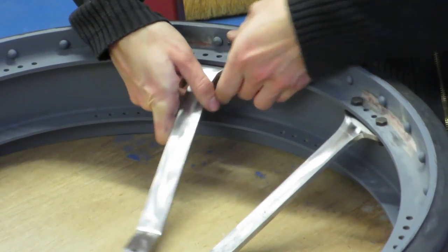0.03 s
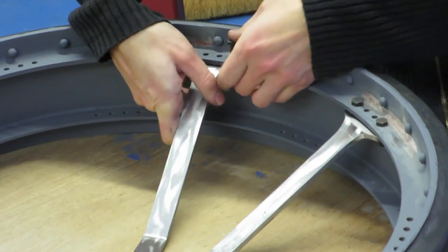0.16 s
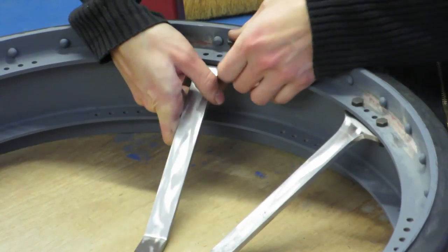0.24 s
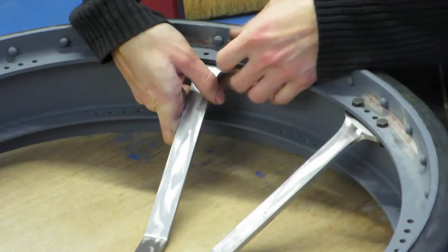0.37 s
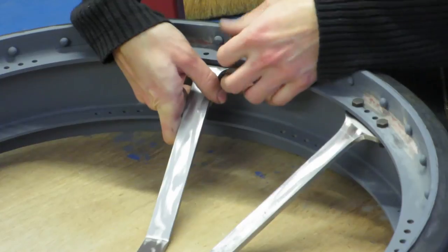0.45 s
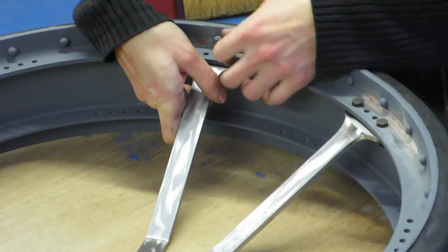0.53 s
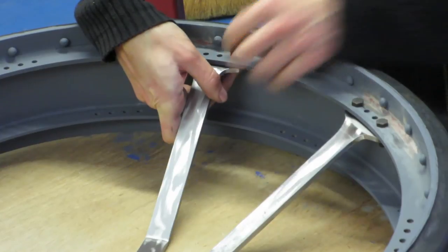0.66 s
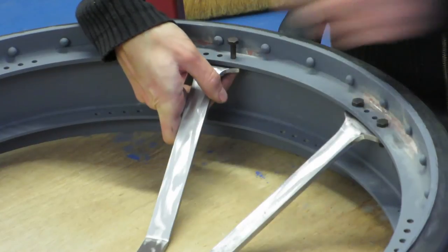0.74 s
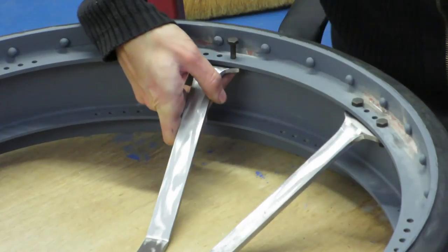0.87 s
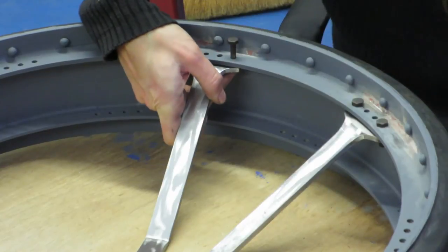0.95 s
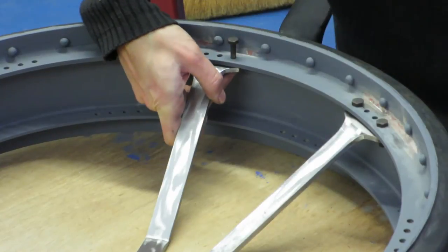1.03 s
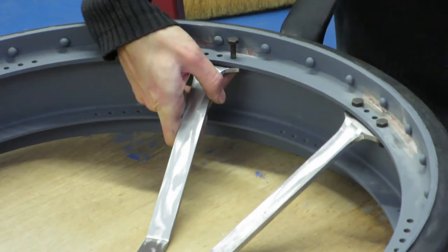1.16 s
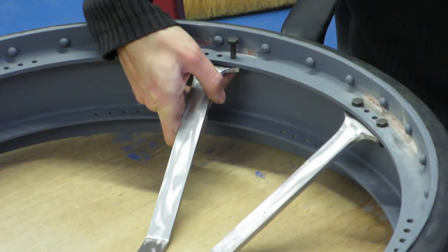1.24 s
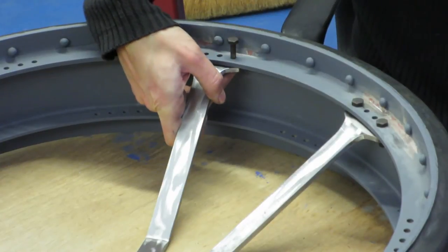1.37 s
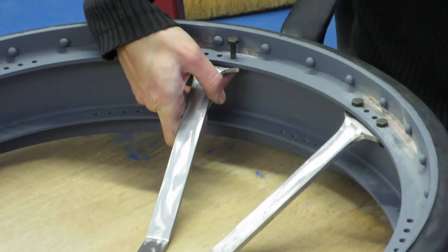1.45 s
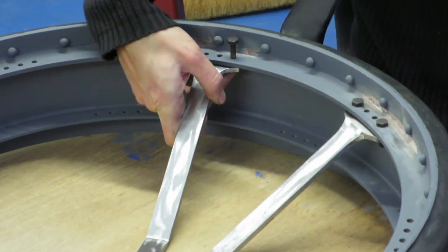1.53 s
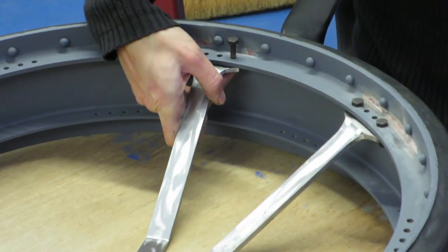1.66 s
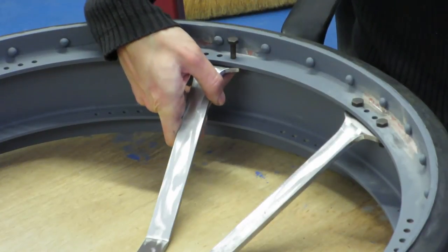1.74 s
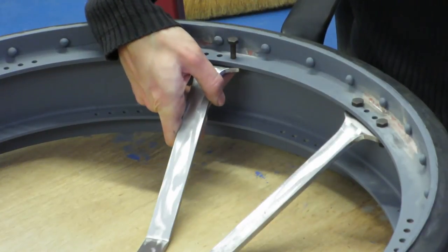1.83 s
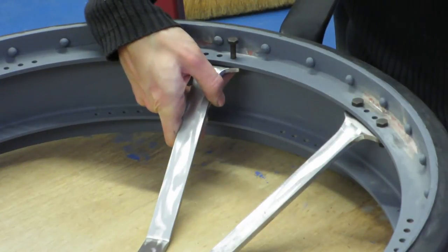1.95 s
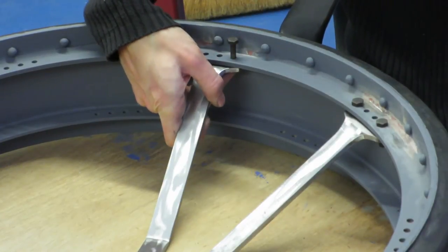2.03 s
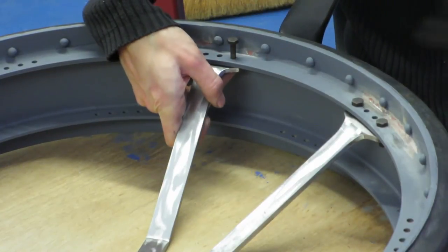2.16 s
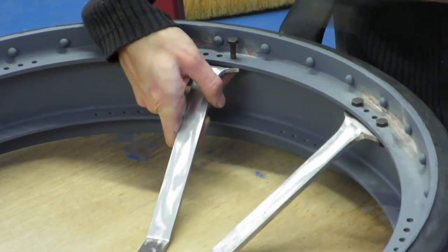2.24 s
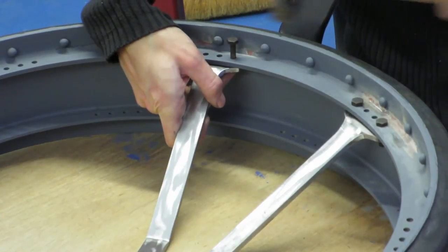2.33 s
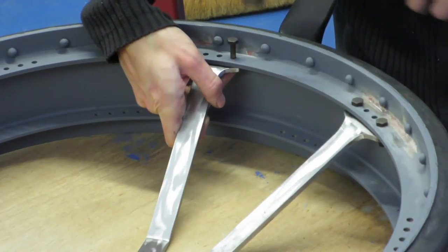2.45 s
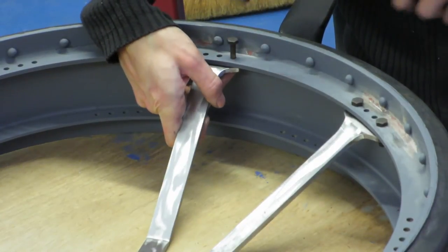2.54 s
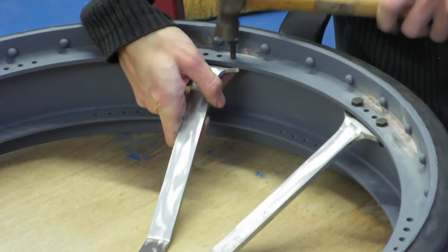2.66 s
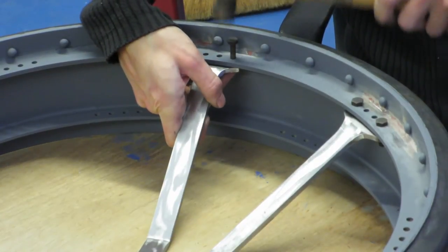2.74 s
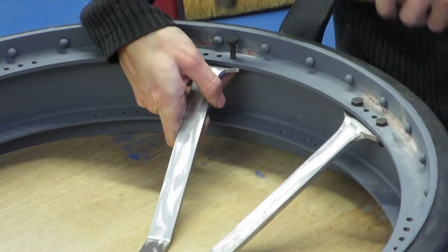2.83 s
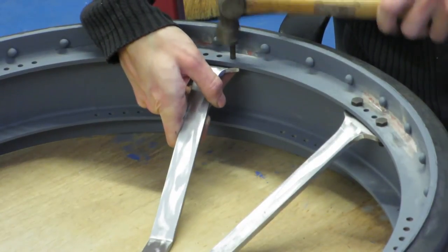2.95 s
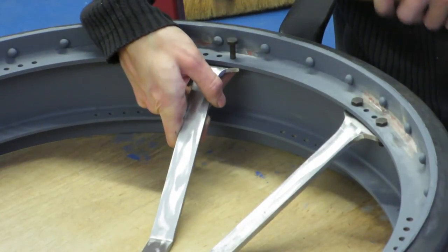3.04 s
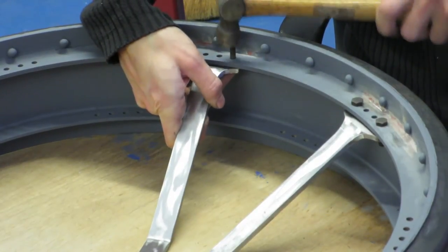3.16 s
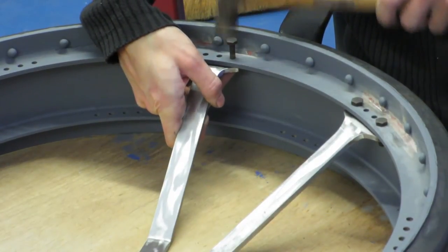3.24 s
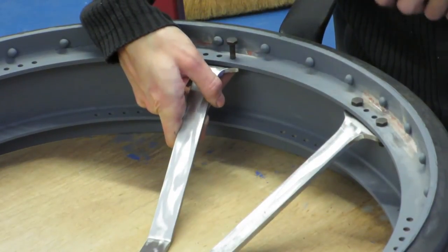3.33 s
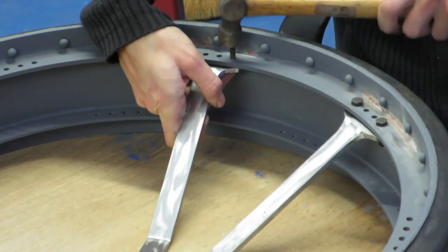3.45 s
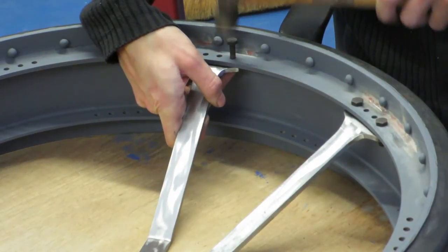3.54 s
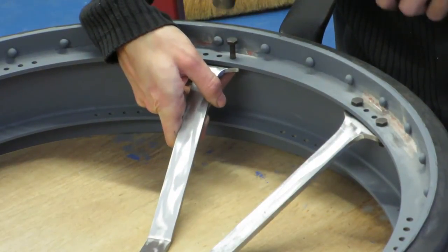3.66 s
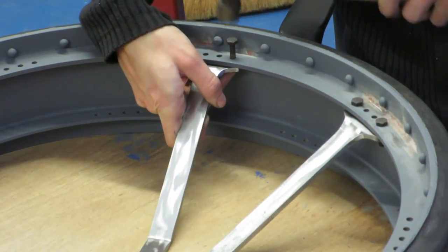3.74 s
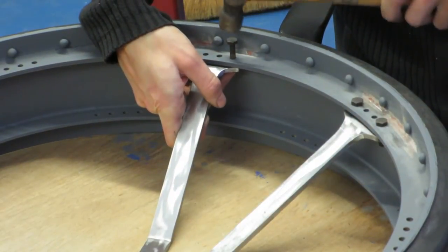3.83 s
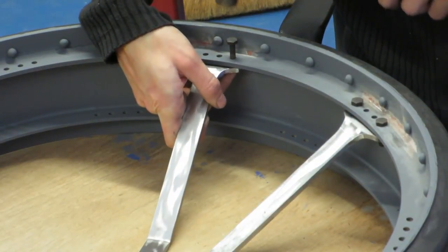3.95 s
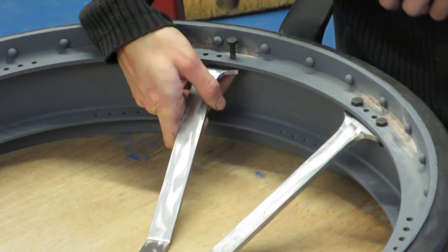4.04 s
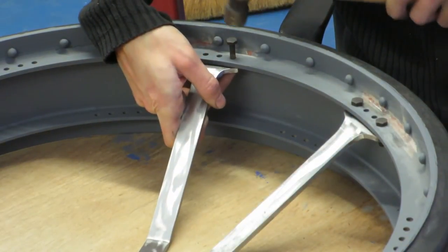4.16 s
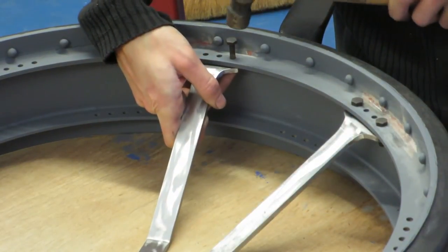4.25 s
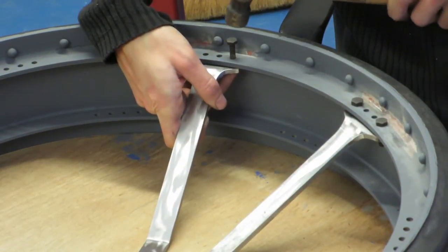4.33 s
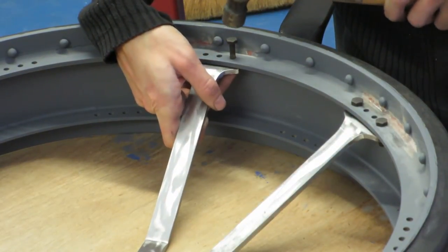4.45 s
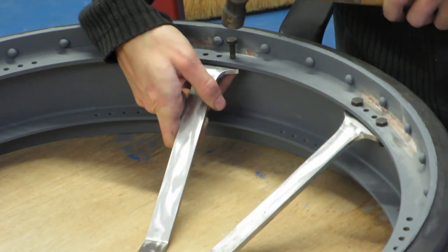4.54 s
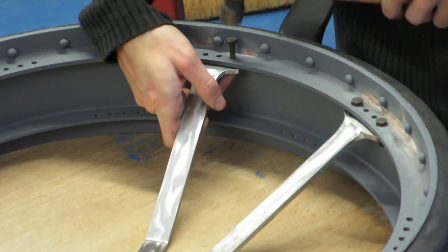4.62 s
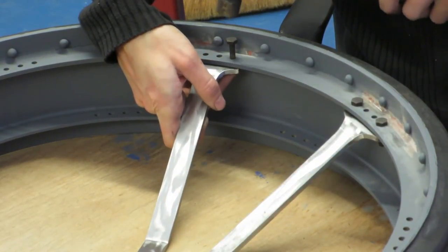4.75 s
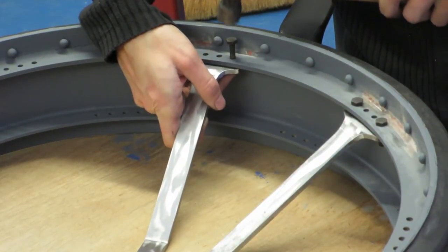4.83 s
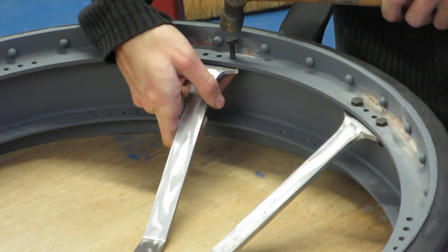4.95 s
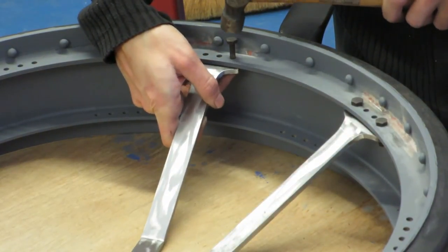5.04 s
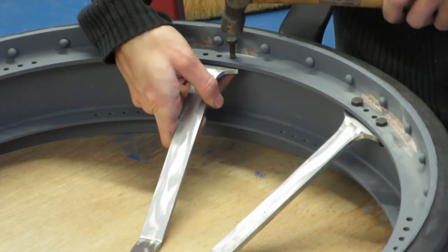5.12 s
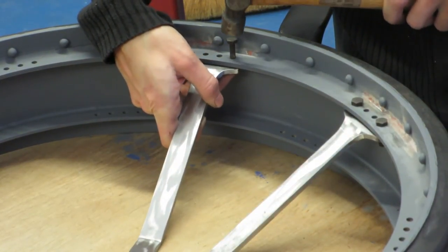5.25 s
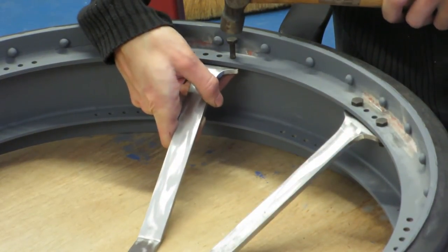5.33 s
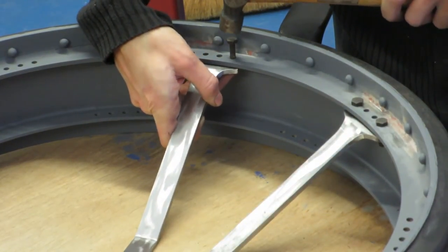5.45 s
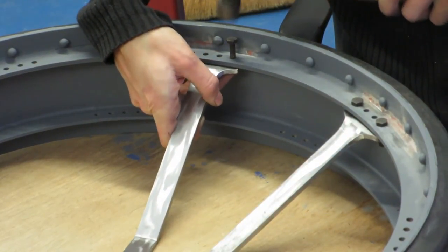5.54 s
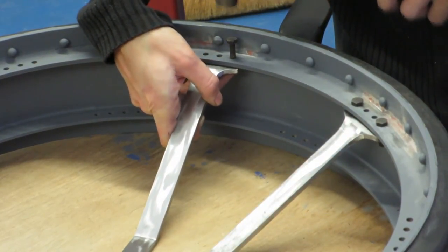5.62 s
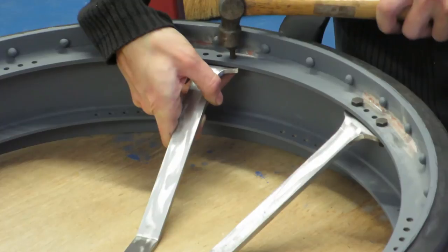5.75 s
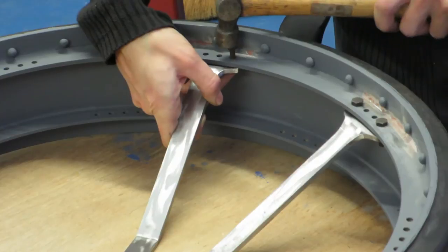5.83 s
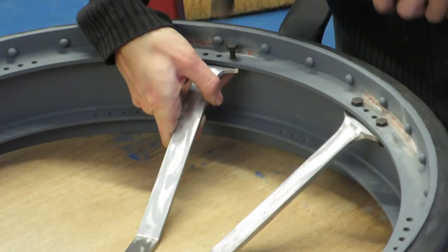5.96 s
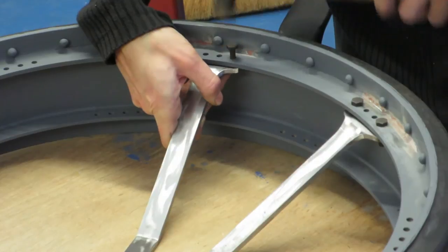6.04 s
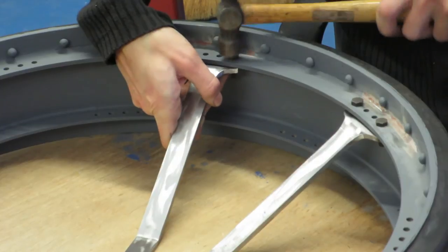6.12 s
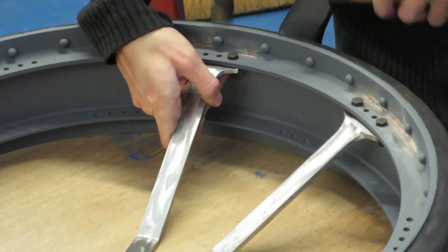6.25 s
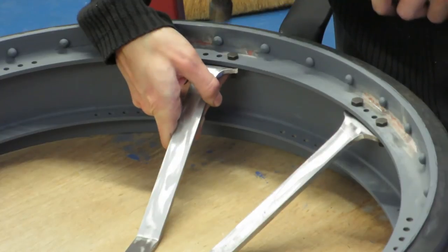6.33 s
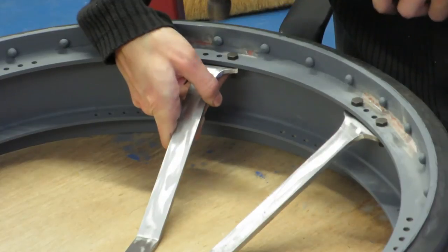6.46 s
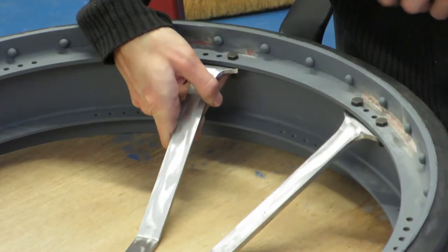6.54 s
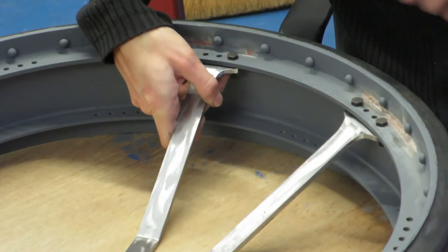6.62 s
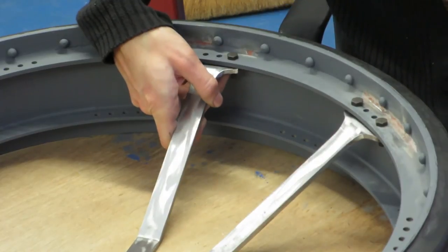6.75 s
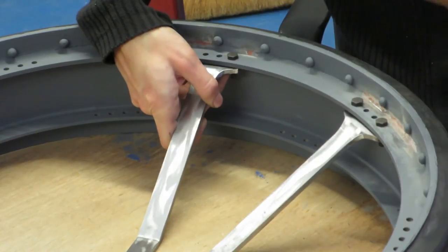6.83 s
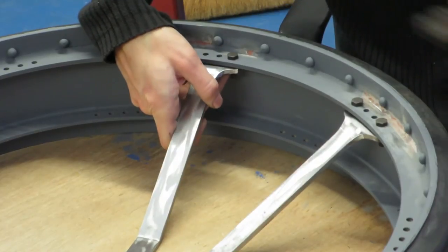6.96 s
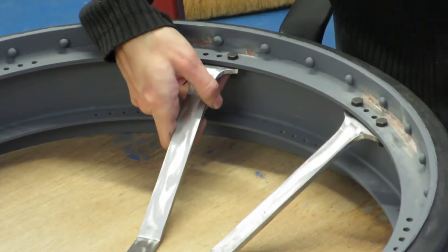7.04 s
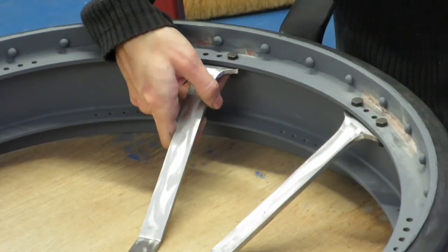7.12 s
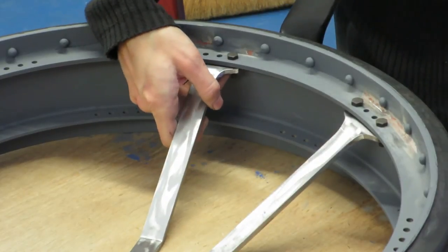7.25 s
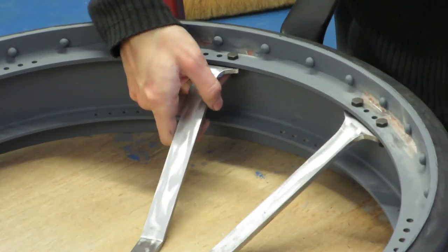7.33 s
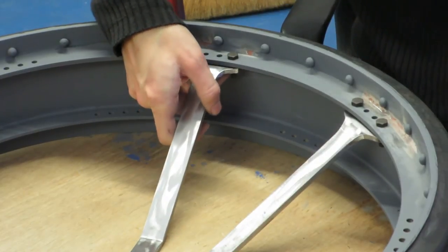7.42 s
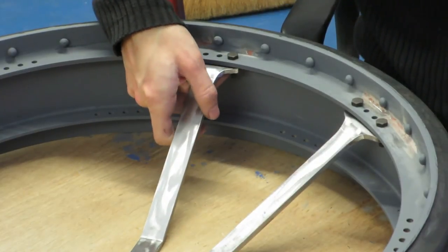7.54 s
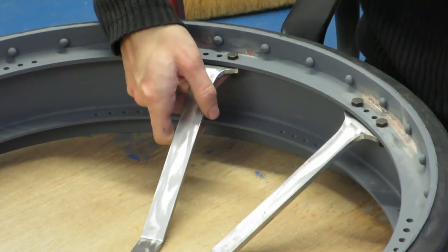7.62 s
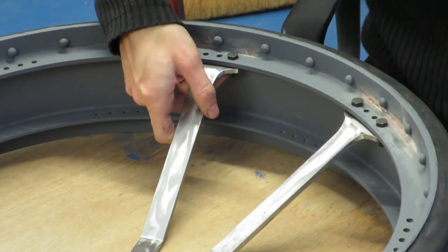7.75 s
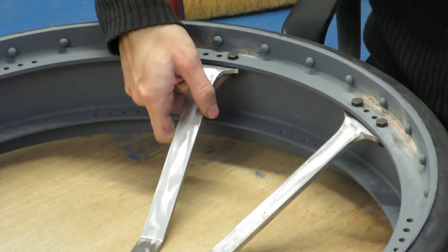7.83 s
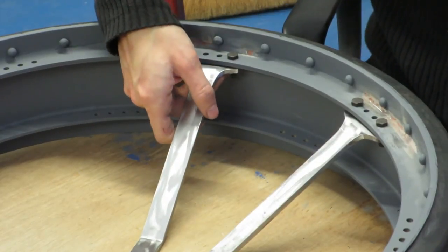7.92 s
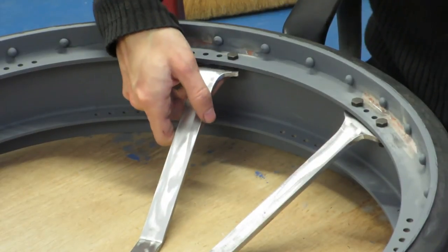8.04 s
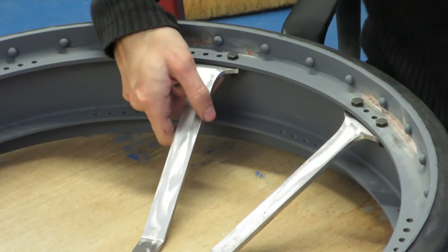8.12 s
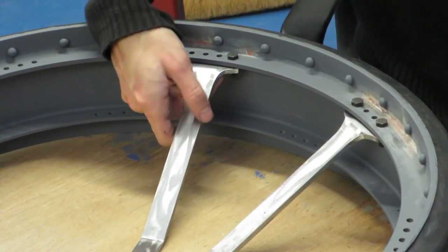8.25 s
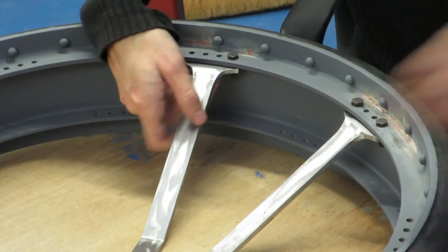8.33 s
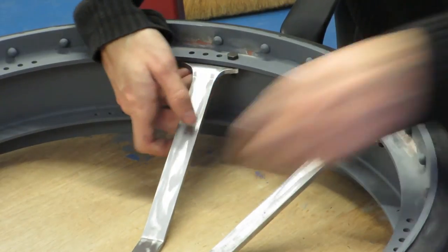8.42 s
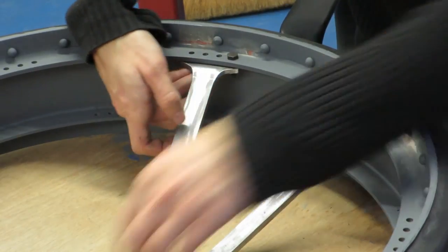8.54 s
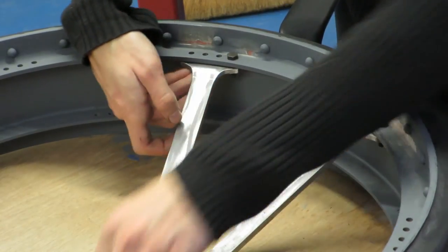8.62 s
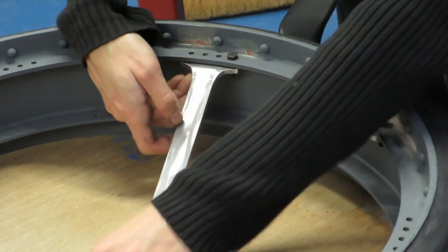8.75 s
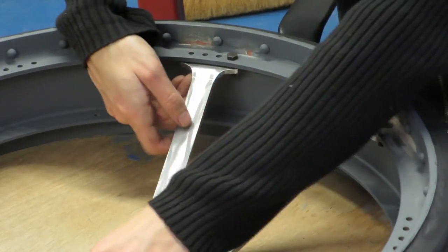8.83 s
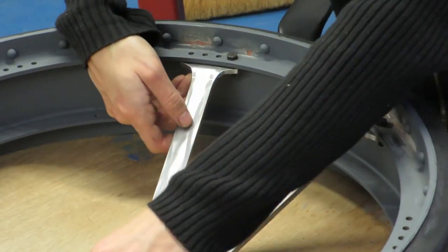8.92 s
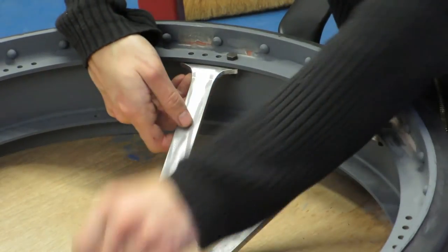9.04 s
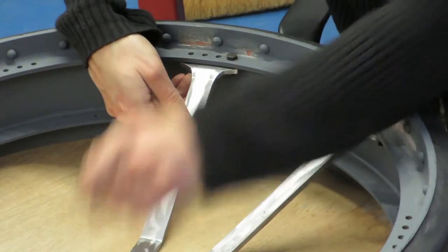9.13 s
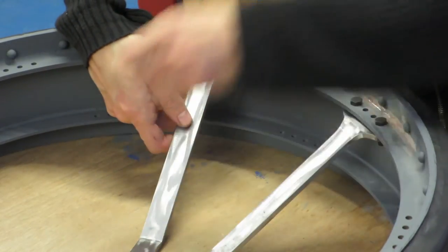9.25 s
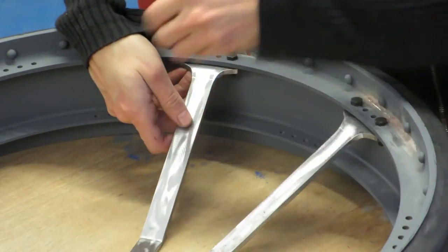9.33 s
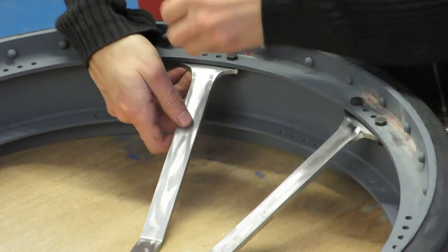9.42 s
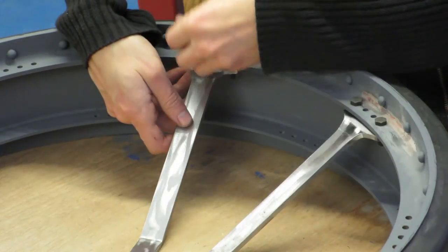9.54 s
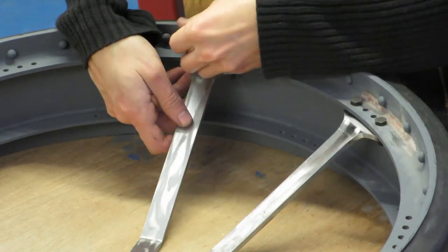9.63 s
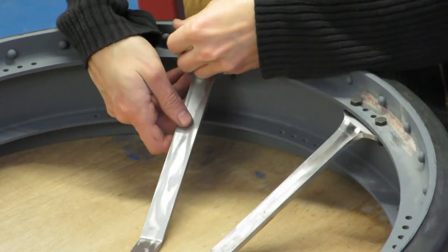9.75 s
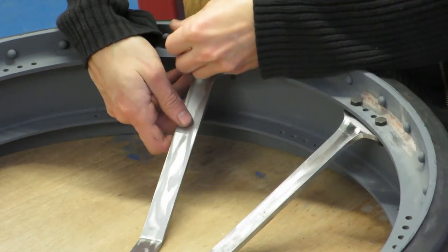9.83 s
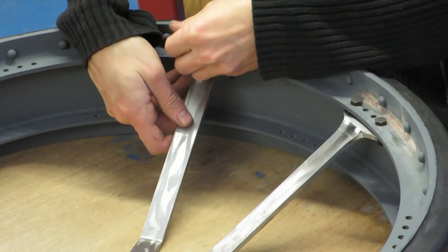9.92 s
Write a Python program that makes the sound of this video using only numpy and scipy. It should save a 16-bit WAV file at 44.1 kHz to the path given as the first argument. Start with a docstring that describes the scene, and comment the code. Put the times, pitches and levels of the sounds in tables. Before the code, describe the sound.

Close stereo pickup in a small workshop. A loose metal spoke clinks in a wheel rim, a hammer drags off the bench with a short singing scrape, then three fast, hard blows ring the steel. Lighter taps and a dull wheel knock follow, two more bursts of tapping, then the hammer clatters onto tools and small metallic touches finish.

```python
"""A loose spoke clinks; a hammer is dragged off a bench and taps a pin through a steel wheel rim into the spoke.
After three hard blows and a light one the wheel knocks on the bench, then come more taps, the last on the rim.
Hands shift the spoke, the hammer goes down with a clatter on the tools, and small knocks and touches follow.
Blows are made of noise bursts and fading sine waves, the drag of noise that makes the hammer head sing. Echo
follows each blow, a low noise and hum run throughout; a gain control ducks at loud blows and creeps back."""
import sys
import numpy as np
from scipy import signal
from scipy.fft import rfft, irfft, next_fast_len
from scipy.io import wavfile
from scipy.ndimage import uniform_filter1d

SR = 44100
rng = np.random.default_rng(int(sys.argv[2]) if len(sys.argv) > 2 else 0)


def persist_wave(psi):
    """Save psi, clipped to +-1, as 16-bit WAV."""
    counts = np.round(np.clip(psi, -1, 1) * 32767).astype(np.int16)
    wavfile.write(sys.argv[1], SR, np.atleast_2d(counts).T)


N = 440118

# the hammer on the pin, last of all on the rim itself: [t/s, level/dB, thud/dB, brightness/dB]
HAMMER_BLOWS = [(2.921, -3.5, -7.5, -2.5), (3.188, -5.5, -6, -0.5), (3.455, -4, -9, -5.5),
                (4.140, -36, 8.5, 1.5), (5.719, -21.5, -5.5, 26.5), (5.733, -40.5, -3, 23),
                (6.118, -28, -11, 25.5), (6.130, -13, -1.5, -2.5)]
# the loose spoke knocking against the rim: [t/s, level/dB, thud/dB, brightness/dB]
SPOKE_KNOCKS = [(0.4635, -25, 7, -13.5), (0.471, -51, -3, -2), (3.200, -17.5, 8, -28.5),
                (3.477, -20.5, 12, -28), (4.156, -26.5, 5.5, -46), (4.470, -48, 11, -21),
                (5.156, -30.5, 14, -31.5), (7.044, -57.5, 12.5, -39), (7.141, -49, 6.5, -30),
                (8.730, -46, 12, -10), (8.762, -35, -14, -21.5)]
# the spoke rocking in its seat under the hand: [start t/s, length/s, middle level/dB, thud/dB]
SPOKE_RATTLES = [(7.433, 0.18, -68.5, 18.5), (8.928, .11, -46.5, 1.5)]
# fingers and sleeve brushing the fittings: [t/s, level/dB]
TOUCHES = [(0.943, -60), (1.274, -53), (5.405, -58), (7.375, -53.5), (9.635, -64), (9.852, -51),
           (9.884, -69)]
# the rim singing on after a blow: [t/s, level/dB, strongest f/Hz, fall of other modes/(dB per octave)]
RIM_RINGS = [(0.464, -5, 1240, 41), (2.921, 0.5, 1790, 40), (3.188, 0.5, 1770, 40), (3.455, 1, 1770, 40),
             (5.156, -2, 1144, 25), (6.130, 3, 1240, 40)]
# the spoke ringing free after a contact: [t/s, level/dB, strongest f/Hz, fall of other modes/(dB per octave)]
SPOKE_CLINKS = [(0.042, -47.5, 1230, 1.5), (0.470, -24, 4400, 48), (4.140, -26, 4750, 27),
                (5.719, -18.5, 1900, 3.5), (7.044, -47, 1950, 23), (7.139, -37.5, 2370, 20)]
# the wheel or the hammer knocking on the bench: [t/s, level/dB, thud/dB, brightness/dB]
BENCH_KNOCKS = [(5.150, -39.5, 19, -18), (7.851, -21.5, 12.5, -15.5), (8.036, -18, 5.6, -6.5)]
# the hammer head catching as it is dragged: [t/s, level/dB, thud/dB, brightness/dB]
HEAD_CATCHES = [(1.381, -33, -1.5, -21), (1.418, -27.5, -13, -19), (1.498, -22.5, -9, -7.5)]
# the hammer head clanking against other tools: [t/s, level/dB, thud/dB, brightness/dB]
TOOL_CLANKS = [(8.035, -20.5, -10, 2), (8.109, -22.5, -7, 10), (8.126, -15, -3, -6), (8.192, -24.5, 3, -21),
               (8.241, -22, -1.5, -23.5)]
# a tool ringing free when hit: [t/s, level/dB, strongest f/Hz, fall of other modes/(dB per octave)]
TOOL_RINGS = [(8.036, -2, 4450, 45)]
# dry snaps of metal edges slipping past each other: [t/s, level/dB, brightness/dB]
EDGE_SNAPS = [(1.498, -10.5, -16), (8.109, -9, 6), (9.250, -23, -9)]

# Modes are the pitches at which a thing rings; t60 is the time to fade by 60 dB.
# ring() shortens any t60 above 0.7 s to 0.7 s; the sliding head keeps its own.
# modes of the rim, spoke and pin: [f/Hz, level/dB, t60/s]
WHEEL_MODES = [(141.7, -20, .9), (234, -16.5, 0.37), (324.4, -15, 0.49), (419.4, -13.5, 0.21),
               (572, -16, 0.36), (713, -14.5, 0.42), (812, -12.5, 0.45), (923, -19.5, .54),
               (1120, -25.5, .58), (1230, -16.5, 0.95), (1634, -21.5, .45), (1715, -18.5, 0.2),
               (1785, -16.5, 1), (1858, -19.5, .55), (1997, -24.5, .5), (2310, -23.5, 0.98),
               (2523, -24, .45), (3000, -22, 0.87), (3174, -20, 0.9), (3440, -23, 0.33), (4750, -18, 0.25),
               (4520, -28.5, 0.23), (6610, -23, 0.35), (8300, -36, 1), (8360, -30, 0.18),
               (9460, -25.5, 0.078), (11420, -22.5, 0.057), (10817, -34.5, 0.42), (13600, -33.5, .33)]
# modes of the free spoke: [f/Hz, level/dB, t60/s]
SPOKE_MODES = [(812, 3, .6), (2010, -4.5, .6), (3165, -7, .7), (4700, -2, 0.43), (6270, -8, 0.95),
               (11080, -9.5, .35)]
# modes of the bench top: [f/Hz, level/dB, t60/s]
BENCH_MODES = [(109.7, -9, 1), (245.2, -13.5, 0.46), (281, -18.5, .6), (369, -6.5, 0.28), (440, -10, 0.475),
               (490, -9, 0.27), (620, -8.5, 0.27)]
# modes of the tools on the bench: [f/Hz, level/dB, t60/s]
TOOL_MODES = [(410, -16, 0.81), (967, -10, 0.46), (1128, -7, 0.8), (1304, -8.5, 0.69), (2860, -7, 0.3),
              (3200, -13.5, 0.8), (4400, -22.5, 0.67), (4440, -23, 0.39), (4900, -27, .15),
              (6500, -17, 0.89), (8770, -20, 0.35), (11430, -21, 0.52), (13930, -64, 0.37)]
# modes of the sliding hammer head: [f/Hz, level/dB, t60/s]
HEAD_MODES = [(468, 2.5, 0.099), (2400, -17, 0.28), (4500, -17, 0.16), (6508, -22, 0.85), (6720, -8, 0.99),
              (7650, -7, 0.47), (10180, -11.5, 0.56), (11380, -15, .08), (12240, -1.5, 0.13),
              (11850, -40, .04), (12030, -16.5, 1.15), (12680, -12, 0.75), (14070, -23, 0.57)]

# Spectra give only the tone; noise() sets the overall level.
# the dry crack of a blow: [f/Hz, level/dB per Hz]
CRACK_SPECTRUM = [(40, -43.5), (100, -20), (170, -5.5), (450, -4.5), (1000, -3), (2100, -4), (2600, 6.5),
                  (3100, -5.5), (5000, -12), (11000, -21), (14000, -27.5), (16000, -44)]
# the echo of a blow or of the drag: [f/Hz, level/dB per Hz]
BODY_SPECTRUM = [(30, -57), (70, -24.5), (110, -7), (170, -4), (270, -0.5), (450, 2), (900, 3.5),
                 (1300, -2), (1800, -4), (2600, -5.5), (3600, -13), (6500, -23), (9000, -20), (13000, -43),
                 (16000, -58)]
# the grit under the dragged hammer: [f/Hz, level/dB per Hz]
GRIT_SPECTRUM = [(60, -36), (400, 19), (2200, 8), (4000, -7), (8000, -4), (12500, -16), (16000, -33)]
# a snap of metal edges: [f/Hz, level/dB per Hz]
SNAP_SPECTRUM = [(200, -32), (900, -18), (1450, -2), (2000, -3), (3300, 0), (5000, -6), (7000, -13),
                 (12000, -16), (16000, -32)]
# the low noise of the workshop: [f/Hz, level/dB per Hz]
FLOOR_SPECTRUM = [(20, -31.5), (32, -23), (50, -6.5), (70, -6), (110, -3), (160, 0.5), (277, -6),
                  (380, -11), (1070, -18), (1260, -13.5), (1450, -18.5), (2610, -25), (5570, -32.5),
                  (14800, -38.5)]
# steady tones of the workshop: [f/Hz, level/dB]
HUM_TONES = [(48.6, -61.5), (145.3, -68), (1254, -75), (15735, -79.5)]
# how fast the echo fades at each pitch: [f/Hz, t60/s]
ECHO_T60 = [(100, 0.51), (260, 0.44), (700, 0.53), (1840, 0.63), (4850, 0.67), (9000, 0.37), (14000, 0.09)]
# how alike the two ears hear a sound: [f/Hz, left-right correlation]
LIKENESS = [(120, .999), (300, 0.94), (700, 0.26), (1500, 0.59), (4000, 0.12), (12000, .35)]

# the drag of the hammer swells as it speeds up, holds, and stops when the head leaves the bench
DRAG_START_S, DRAG_SWELL_S, DRAG_HOLD_S, DRAG_RELEASE_S = 1.27, 0.16, 0.076, .04
DRAG_SWELL_DB, SQUEAL_SWELL_DB = 18, 14  # the singing swells by both together, the grit by the first alone


def amp(db):
    """Turns decibels into a gain."""
    return 10 ** (np.asarray(db) / 20)


def evened(x):
    """Scales a sound to rms 1."""
    return x / np.sqrt(np.mean(x ** 2) + 1e-20)


def read(points, hz):
    """Reads a table between its points, on a log-frequency axis."""
    f, value = np.transpose(points)
    return np.interp(np.log(hz + 1), np.log(f + 1), value)


def add(mix, s, sound):
    """Mixes a stereo sound in at time s."""
    part = mix[:, round(s * SR):][:, :sound.shape[1]]
    part += sound[:, :part.shape[1]]


def noise(spectrum, size):
    """Stereo noise of rms 1, nearly the same in both ears in the bass."""
    hz = np.fft.rfftfreq(size, 1 / SR)
    mid, side = rfft(rng.standard_normal((2, size)))
    same = np.clip(read(LIKENESS, hz), 0, 1)
    mid, side = mid * np.sqrt(1 + same), side * np.sqrt(1 - same)
    left_right = np.array([mid + side, mid - side])
    return evened(irfft(left_right * amp(read(spectrum, hz)), size))


def colour(x, spectrum, size=2048):
    """Filters a sound to the given spectrum without smearing it ahead of its start."""
    log_gain = np.log(amp(read(spectrum, abs(np.fft.fftfreq(size, 1 / SR)))))
    taps = np.fft.ifft(np.exp(np.conj(signal.hilbert(log_gain)))).real  # minimum phase
    return signal.fftconvolve(x, taps[None, :size // 2], axes=1)[:, :x.shape[1]]


def echo_tail(spectrum, size):
    """Echo of a sound with this spectrum: noise whose bands each die at their own speed."""
    hz, t, z = signal.stft(noise(spectrum, size), SR, nperseg=256)
    fading = z * amp(-60 * t / read(ECHO_T60, hz)[:, None])
    return signal.istft(fading, SR, nperseg=256)[1][:, :size]


def ring(modes, t, ping_db=6, ping_t60=0.1, sustain_db=-2):
    """Each mode pings while the parts touch, then sings on faintly, out of step between the ears."""
    out = np.zeros((2, len(t)))
    for hz, db, t60 in modes:
        ear_phase = np.arccos(np.clip(read(LIKENESS, hz), 0, 1)) * np.array([[.5], [-.5]])
        ear_phase = ear_phase * rng.choice([-1, 1])
        damped_t60 = min(t60, .7)
        envelope = amp(ping_db - 60 * t / ping_t60) + amp(sustain_db - 60 * t / damped_t60)
        out += amp(db) * envelope * np.sin(2 * np.pi * (hz * t + rng.random()) + ear_phase)
    return out


def mode_spectrum(modes, width_share):
    """Draws the modes as resonance peaks, wider at higher pitch; rows [f/Hz, level/dB per Hz]."""
    hz = np.geomspace(30, SR / 2, num=3000)
    power = 1e-16
    for mode_hz, db, _ in modes:
        width = width_share * (mode_hz + 500)
        power = power + amp(db) ** 2 / width / (1 + ((hz - mode_hz) / width) ** 2) ** 2
    return np.c_[hz, 10 * np.log10(power)]


def contacts(rows, crack_db, ring_db, edge_db, edge_share):
    """Harder contact lifts the sparkle (12 kHz) by its brightness, the edge (4.2 kHz) by a share of it."""
    return [(s, db, thud_db, edge_db + edge_share * bright_db, bright_db, crack_db, ring_db)
            for s, db, thud_db, bright_db in rows]


def knocks(rows, modes, crack_t60, early_db, early_t60, bloom_s, clang_db, width_share,
           treble_left_db, count=5, size=36864):
    """A blow is a crack, quick reflections, ringing modes and echo, coloured by how hard the contact is."""
    out, t = np.zeros((2, N)), np.arange(size) / SR
    bloom, fall = 1 - np.exp(-t / bloom_s), amp(-60 * t / crack_t60)
    peaks = mode_spectrum(modes, width_share)
    mode_rms = np.linalg.norm(amp([m[1] for m in modes]))
    ping = ring(modes, t) * (1 - np.exp(-t / .0006))
    variants = []  # a few noise variants, taken in turn by the blows
    for _ in range(count):
        crack = noise(CRACK_SPECTRUM, size)[0] * fall
        crack = crack * np.linalg.norm(fall) / np.linalg.norm(crack)
        reflections = noise(CRACK_SPECTRUM, size) * amp(early_db - 60 * t / early_t60)
        clang = amp(clang_db) * mode_rms * echo_tail(peaks, size) * bloom
        variants.append((crack + reflections, echo_tail(BODY_SPECTRUM, size) * bloom, ping + clang))
    for k, (s, db, thud_db, edge_db, sparkle_db, crack_db, ring_db) in enumerate(rows):
        crack, tail, modal = variants[k % count]
        hardness = [(480, thud_db), (1300, 0), (2000, 0.0051), (4200, edge_db), (12000, sparkle_db)]
        blow = amp(crack_db) * crack + tail + amp(ring_db) * modal
        add(out, s, amp(db) * colour(blow, hardness))
    treble = signal.sosfilt(signal.butter(1, 4000, "high", fs=SR, output="sos"), out)
    out = out + treble * (amp([[treble_left_db / 2], [-treble_left_db / 2]]) - 1)  # treble leans left
    low_cut = signal.butter(5, 85, "high", fs=SR, output="sos")  # knocks carry little deep bass
    return signal.sosfilt(low_cut, out)


def clinks(rows, modes, ping_db, ping_t60, sustain_db, size=32768):
    """A part rings with its own modes, most strongly near the pitch that the point of contact favours."""
    out, t = np.zeros((2, N)), np.arange(size) / SR
    onset = 1 - np.exp(-t / 0.00068)
    for s, db, centre_hz, falloff_db in rows:
        struck = [(hz, mode_db - falloff_db * abs(np.log2(hz / centre_hz)), t60)
                  for hz, mode_db, t60 in modes]
        add(out, s, amp(db) * ring(struck, t, ping_db, ping_t60, sustain_db) * onset)
    return out


def wheel():
    """Hammer, spoke and fingers strike the wheel, whose rim and spoke also ring freely."""
    rows = (contacts(HAMMER_BLOWS, crack_db=12.0, ring_db=4, edge_db=-0.5, edge_share=.3)
            + contacts(SPOKE_KNOCKS + rattles(), crack_db=10, ring_db=3.0, edge_db=0.5, edge_share=0.94)
            + contacts(touches(), crack_db=4, ring_db=-1, edge_db=2, edge_share=.6))
    struck = knocks(rows, WHEEL_MODES, crack_t60=0.023, early_db=-18.5, early_t60=0.082, bloom_s=0.0014,
                    clang_db=-6, width_share=0.016, treble_left_db=3.0)
    spoke = clinks(SPOKE_CLINKS, SPOKE_MODES, ping_db=5, ping_t60=0.035, sustain_db=-16)
    rim = clinks(RIM_RINGS, WHEEL_MODES, ping_db=-7, ping_t60=0.11, sustain_db=-15)
    return struck + spoke + rim


def rattles(bright_db=-25, spread_db=4.5, jitter_s=0.0038, count=3):
    """A rocking spoke knocks a few times, dully and a little unevenly."""
    return [(start + length * k / count + jitter_s * late, db + spread_db * hard, thud_db, bright_db)
            for start, length, db, thud_db in SPOKE_RATTLES
            for k, (late, hard) in enumerate(rng.standard_normal((count, 2)))]


def touches(thud_db=0, bright_db=7):
    """Every touch is the same light, bright contact, only softer or louder."""
    return [(s, db, thud_db, bright_db) for s, db in TOUCHES]


def bench():
    """The bench top is knocked, and the dragged hammer head catches on it."""
    rows = (contacts(BENCH_KNOCKS, crack_db=13, ring_db=-3.0, edge_db=1, edge_share=0.7)
            + contacts(HEAD_CATCHES + chatter(), crack_db=13.5, ring_db=-7, edge_db=0.5, edge_share=0.58))
    return knocks(rows, BENCH_MODES, crack_t60=0.0081, early_db=-17.0, early_t60=0.04, bloom_s=0.0003,
                  clang_db=-6.5, width_share=0.015, treble_left_db=5.5, count=3)


def chatter(level_db=-41, spread_db=3, thud_db=-6, bright_db=0, count=6):
    """At full speed the dragged head sticks and slips, in small bright catches."""
    return [(DRAG_START_S + DRAG_SWELL_S + DRAG_HOLD_S * (k + late) / count,
             level_db + spread_db * hard, thud_db, bright_db)
            for k, (late, hard) in enumerate(rng.uniform(-1, 1, (count, 2)))]


def tools():
    """The hammer head clanks against loose tools, and one rings on freely."""
    rows = contacts(TOOL_CLANKS, crack_db=6.5, ring_db=-5, edge_db=-0.5, edge_share=1.0)
    struck = knocks(rows, TOOL_MODES, crack_t60=0.0015, early_db=-4.5, early_t60=0.12, bloom_s=0.00082,
                    clang_db=2.5, width_share=0.02, treble_left_db=2.5, count=3)
    return struck + clinks(TOOL_RINGS, TOOL_MODES, ping_db=2, ping_t60=0.34, sustain_db=-12)


def slide(push_db=-35, grit_db=-2, squeal_db=-1, echo_db=-3, size=65536):
    """Friction noise makes the hammer head sing in its modes as it slides over the bench."""
    t = np.arange(size) / SR
    to_go = np.maximum(1 - t / DRAG_SWELL_S, 0)
    gone = np.maximum(t - DRAG_SWELL_S - DRAG_HOLD_S, 0)
    push = amp(push_db - DRAG_SWELL_DB * to_go - 60 * gone / DRAG_RELEASE_S)
    sound = amp(grit_db) * push * noise(GRIT_SPECTRUM, size)
    for hz, mode_db, t60 in HEAD_MODES:
        mode = np.sin(2 * np.pi * hz * t) * amp(-60 * t / t60)
        mode = mode[None] / np.linalg.norm(mode)
        rub = push * amp(-SQUEAL_SWELL_DB * to_go) * noise([(20, 0), (20000, 0)], size)  # flat spectrum
        sound += amp(squeal_db + mode_db) * signal.fftconvolve(rub, mode, axes=1)[:, :size]
    tail = echo_tail(BODY_SPECTRUM, size)
    tail = tail / np.linalg.norm(tail)
    dry_rub = push * rng.standard_normal((1, size))
    sound += amp(echo_db) * signal.fftconvolve(dry_rub, tail, axes=1)[:, :size]
    out = np.zeros((2, N))
    add(out, DRAG_START_S, sound)
    return out


def snaps(size=4096):
    """A snap is a noise burst that is over in a few milliseconds and leaves nothing ringing."""
    out, t = np.zeros((2, N)), np.arange(size) / SR
    snap_t60 = .008  # seconds
    for s, db, bright_db in EDGE_SNAPS:
        burst = noise(SNAP_SPECTRUM, size) * amp(-60 * t / snap_t60)
        add(out, s, amp(db) * colour(burst, [(2000, 0), (12000, bright_db)]))
    return out


def workshop(floor_db=-52.5):
    """Low room noise with a faint hum and whine made of steady sine waves."""
    t = np.arange(N) / SR
    hum = sum(np.sqrt(2) * amp(db) * np.sin(2 * np.pi * (hz * t + rng.random())) for hz, db in HUM_TONES)
    return amp(floor_db) * noise(FLOOR_SPECTRUM, next_fast_len(N, True))[:, :N] + hum


def scene():
    """Wheel, bench, tools, drag, snaps and room sound together."""
    return wheel() + bench() + tools() + slide() + snaps() + workshop()


def record(dry, threshold_db=-5, recover_db=1.5, attack_s=0.0014):
    """Gain drops fast at loud sounds and recovers by recover_db a second; what slips through clips."""
    power = uniform_filter1d((dry ** 2).mean(0), size=88)  # averaged over about 2 ms
    power_db = 10 * np.log10(abs(power) + 1e-12)
    recovery = np.arange(N) / SR * recover_db
    held_db = np.maximum.accumulate(power_db + recovery) - recovery  # peaks, slowly let go
    over_db = np.maximum(held_db - threshold_db, 0)
    hold = np.exp(-1 / (attack_s * SR))
    ducked = dry / amp(signal.lfilter([1 - hold], [1, -hold], over_db))
    low_pass = signal.firwin(511, 16400, window=("kaiser", 9), fs=SR)  # nothing much above 16.4 kHz
    return signal.oaconvolve(np.clip(ducked, -1, 1), low_pass[None], "same")


dry = scene()
out = record(dry)
persist_wave(out)
```